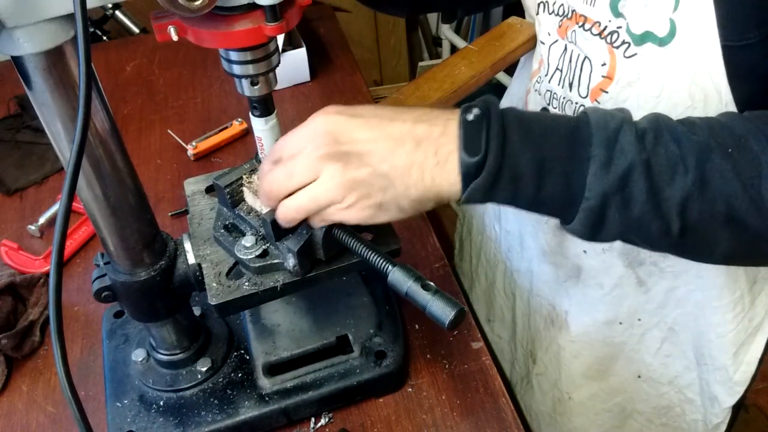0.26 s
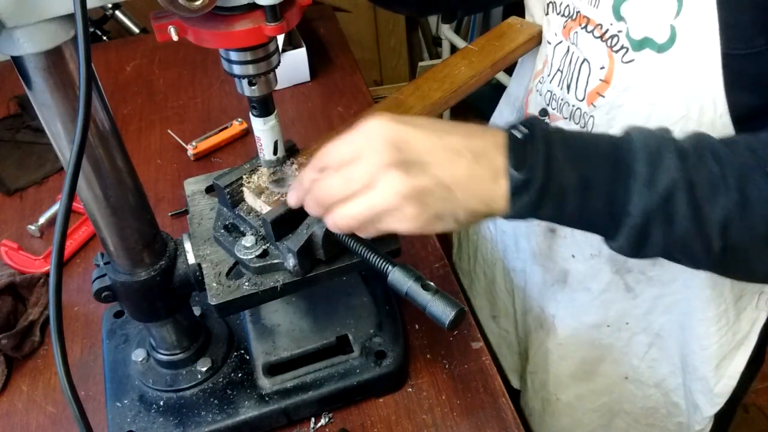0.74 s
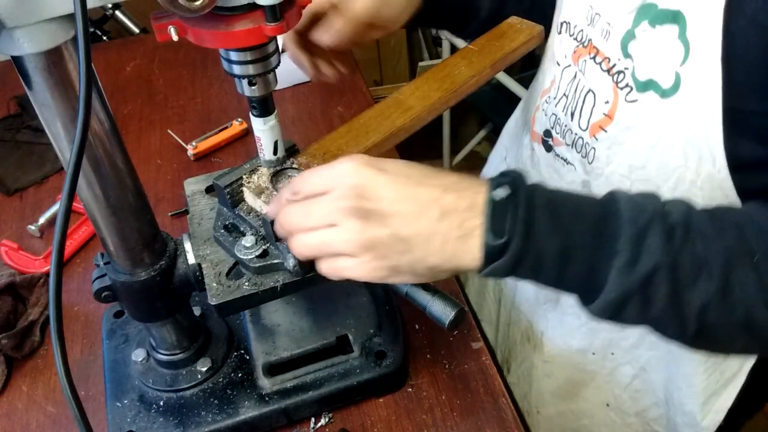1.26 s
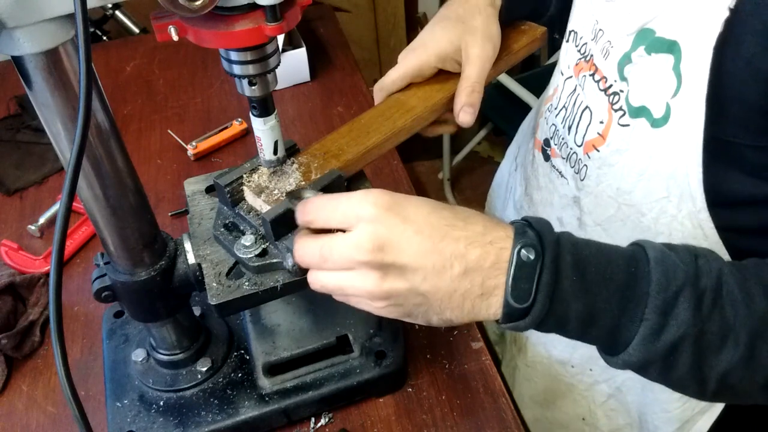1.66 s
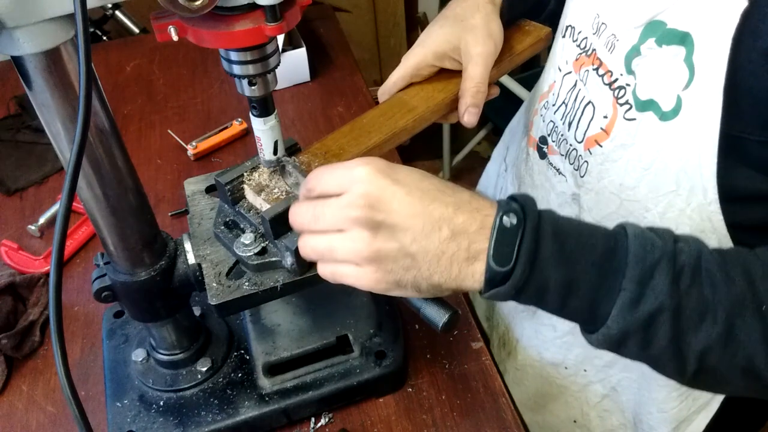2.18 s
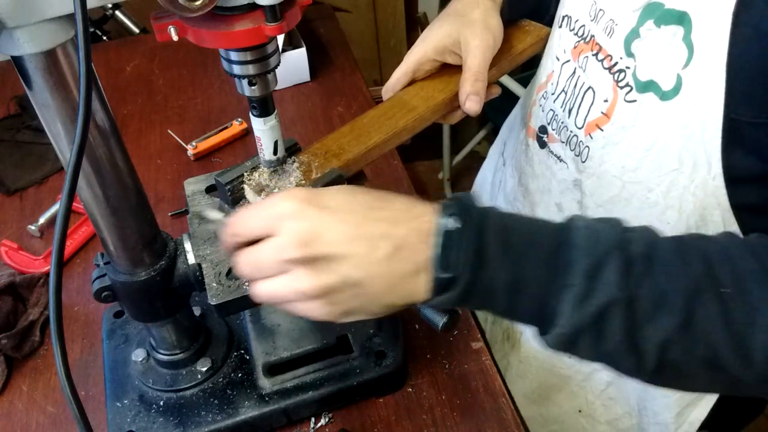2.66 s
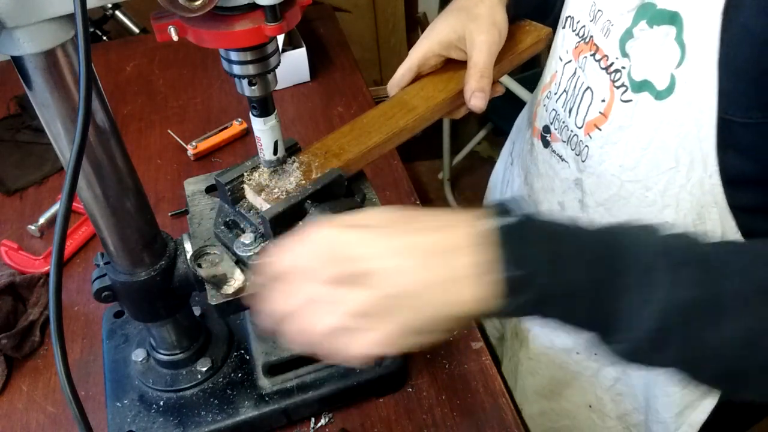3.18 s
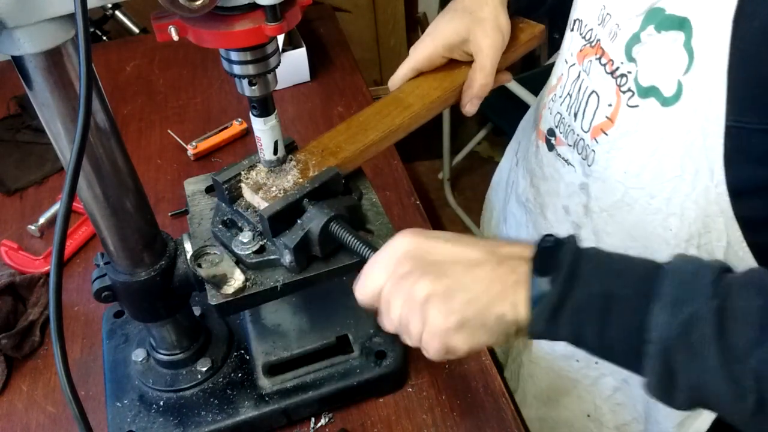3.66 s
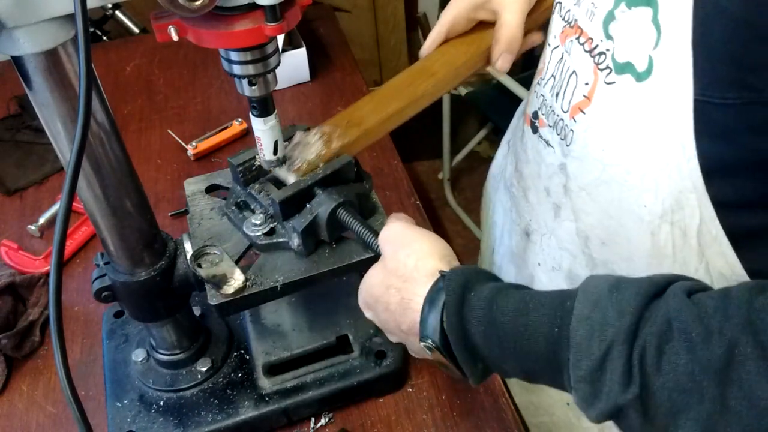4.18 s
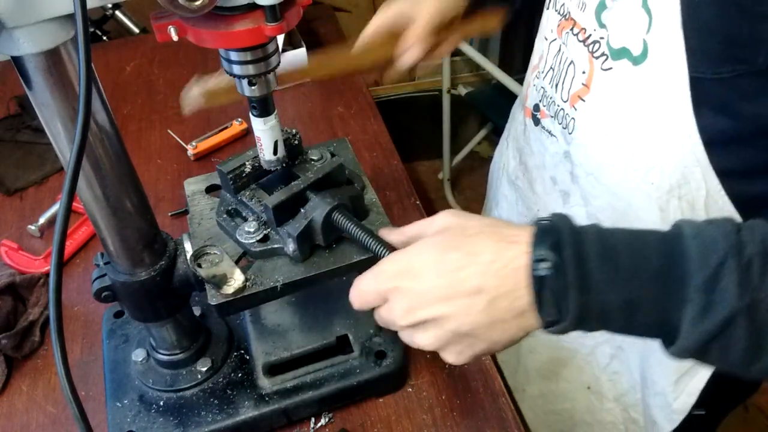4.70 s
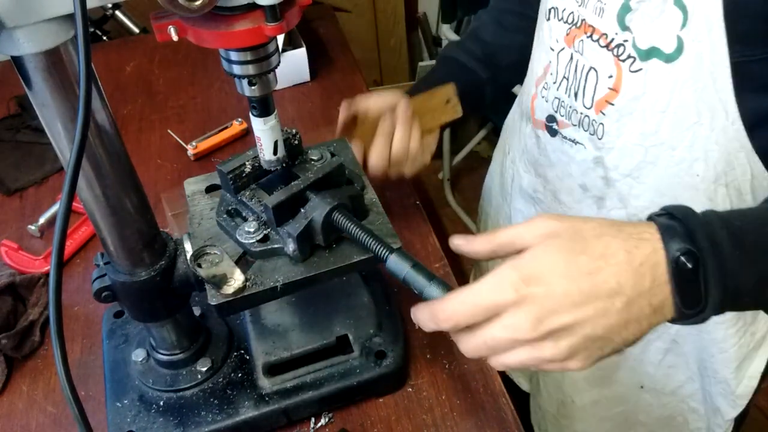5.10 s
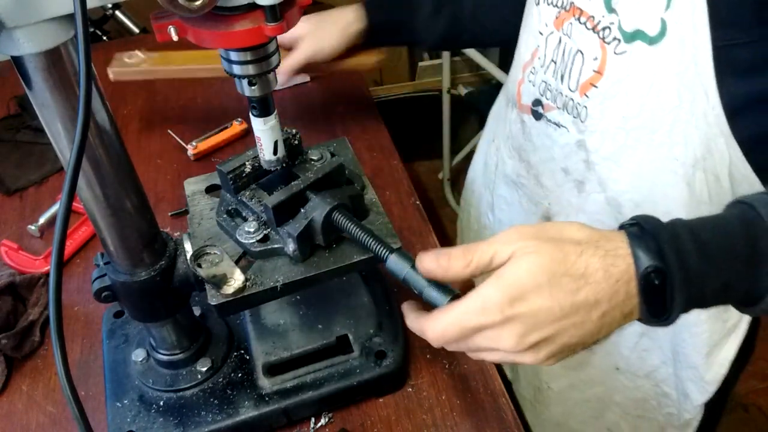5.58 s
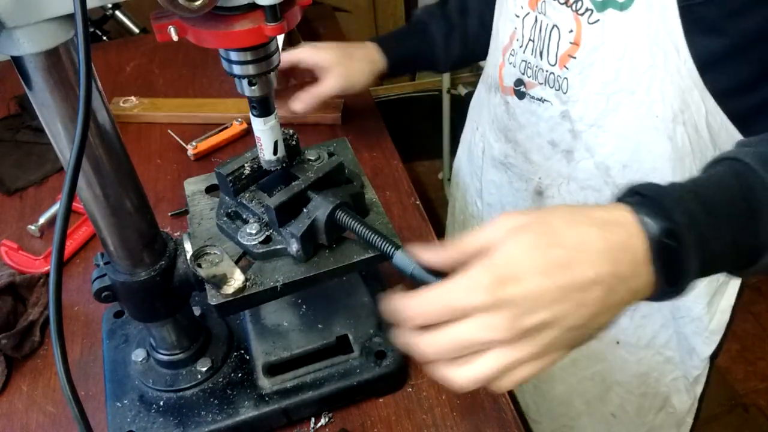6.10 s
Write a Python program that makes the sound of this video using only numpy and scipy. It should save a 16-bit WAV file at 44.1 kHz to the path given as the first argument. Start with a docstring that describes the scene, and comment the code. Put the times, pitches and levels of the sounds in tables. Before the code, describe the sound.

A small, hard-walled workshop heard by a close stereo microphone, with faint low air noise and hum. From 0 s fingers rub softly; at about 0.4 s a piece is wrenched with a short raspy groan and small knocks, then grazes a steel cup with a faint high shimmer. At 0.9 s a bright bell-like ping rings briefly, damped by a finger. Quiet rubs and taps continue from 1.4 to 2.3 s, with thinner pings at 1.8 and 2.0 s. At 2.9 s the piece drops, rattling, on an iron table. Vise clacks come at 3.5, 3.8 and 4.0 s. Around 4.0-4.4 s a wooden slat scrapes out with a low creak and a light tap. Loud woody bench bumps land at 4.9 and 5.2 s; the background sinks at 5.3 s. At 5.8-6.0 s the slat is laid down with a quick clatter, the room ringing after.

```python
"""Clearing a drill press vise

In a small workshop a cut-out piece is worked loose, pinging the hole saw, and dropped on the iron table.
The vise clacks open; a wooden slat scrapes out, bumps the bench and is laid down with a clatter.
Blows are coloured noise bursts plus dying modes, rubs are clumps of tiny slips, pings are beating sines.
Filtered noise and faint hum lie beneath; dense reflections with one echo surround the handling."""
import sys
import numpy as np
from scipy import signal
from scipy.fft import rfft, irfft
from scipy.io import wavfile
from scipy.ndimage import uniform_filter1d

SR = 44100
rng = np.random.default_rng(int(sys.argv[2]) if len(sys.argv) > 2 else 0)


def store_pcm(level_fs):
    """Save levels as 16-bit WAV."""
    pcm = np.round(np.clip(level_fs, -1, 1) * 32767).astype(np.int16)
    wavfile.write(sys.argv[1], SR, np.atleast_2d(pcm).T)


N = 279594
TIME = np.arange(N) / SR
HZ = np.fft.rfftfreq(4096, 1 / SR)
# times a left-minus-right difference in dB, this gives each port its half
SIDES = np.array([[.5], [-.5]])


def amp(db):
    """Decibels to gain."""
    return 10 ** (np.asarray(db) / 20)


def evened(x):
    """Scales to rms 1."""
    return x / np.sqrt(np.mean(x ** 2) + 1e-20)


def blow_level(x):
    """Scales to rms 1 over the first 25 ms."""
    return x / np.sqrt(np.mean(x[:, :SR // 40] ** 2))


def read(points, hz):
    """Reads a table on a log-frequency axis."""
    f, value = np.transpose(points)
    return np.interp(np.log(hz + 1), np.log(f + 1), value)


def add(mix, s, sound):
    """Lays a stereo sound into the mix."""
    part = mix[:, max(round(s * SR), 0):][:, :sound.shape[1]]
    part += sound[:, :part.shape[1]]


def lumps(length, size):
    """Slow chance, scaled to rms 1, that changes about every size samples."""
    chance = rng.standard_normal(max(length, 20 * size))
    smooth = uniform_filter1d(chance, size, mode="wrap")
    smooth = uniform_filter1d(smooth, size, mode="wrap")
    return evened(smooth)[:length]


def colour(x, db):
    """Causal filter shaped by db on the HZ grid, its highest point at unity gain."""
    log_gain = np.log(amp(np.maximum(db - db.max(), -90)))
    circle = np.r_[log_gain, log_gain[-2:0:-1]]
    # minimum phase: the Hilbert transform of the log gain supplies the phase
    taps = np.fft.ifft(np.exp(np.conj(signal.hilbert(circle)))).real
    return signal.oaconvolve(x, taps[None], axes=1)[:, :x.shape[1]]


def whitened(x, size=9):
    """Evens out the broad lumps in the spectrum of a burst."""
    z = rfft(x)
    power = uniform_filter1d(abs(z) ** 2, size, axis=1)
    return irfft(z / np.sqrt(power + 1e-12), x.shape[1])


# likeness of the two microphone ports, 1 alike to -1 opposed: pitch_hz, likeness
PORT_LIKENESS = [(900, 0.67), (1700, 0.71), (2400, -1.004), (3600, 0.78), (5000, -0.52), (12000, 1)]


def ports(pair):
    """Blends two unrelated signals: mostly alike in the bass, opposed in parts of the treble."""
    size = pair.shape[1]
    same = np.clip(read(PORT_LIKENESS, np.fft.rfftfreq(size, 1 / SR)), -.98, .98)
    mid, side = rfft(pair) * np.sqrt([(1 + same) / 2, (1 - same) / 2])
    return irfft([mid + side, mid - side], size)


def ring(modes, t, upper_db=0):
    """Dying sines, out of step by the ports' unlikeness; those near 8 kHz are raised by upper_db."""
    out = 0
    for hz, db, t60 in modes:
        port_shift = SIDES * np.arccos(np.clip(read(PORT_LIKENESS, hz), -1, 1))
        phase = 2 * np.pi * rng.random() + port_shift
        level_db = db + upper_db * (7000 < hz < 9000)
        out = out + amp(level_db - 60 * t / t60) * np.sin(2 * np.pi * hz * t + phase)
    return out


def resonances(modes, height_db):
    """Bumps in dB on the HZ grid: a thing answers most near its modes, above all the strong ones."""
    top = max(db for _, db, _ in modes)
    bumps = [np.sqrt(amp(db - top)) / (1 + ((HZ - hz) / (8 + .018 * hz)) ** 2) for hz, db, _ in modes]
    return height_db * np.max(bumps, axis=0)


# how long the room rings: pitch_hz, t60_s
ROOM_T60 = [(100, 0.66), (3500, 0.46), (6000, 0.44), (14000, 0.043)]
# the far wall's smeared echo, its height over the tail in dB
ECHO_S, ECHO_SPREAD_S, ECHO_DB = 0.0511, 0.0043, 3


def room(x, build_s=0.0027):
    """Dense reflections build up quickly, each band dying at its own speed, with one far-wall echo."""
    age = TIME[:SR]
    hz, t, z = signal.stft(whitened(rng.standard_normal((2, SR))), SR, nperseg=256)
    decay = amp(-60 * t / read(ROOM_T60, hz)[:, None])
    tail = signal.istft(z * decay, SR, nperseg=256)[1][:, :SR]
    echo = amp(ECHO_DB * np.exp(-((age - ECHO_S) / ECHO_SPREAD_S) ** 2))
    tail = ports(whitened(tail, size=80)) * (1 - np.exp(-(age / build_s) ** 2)) * echo
    tail = tail[:, :SR * 3 // 4]
    # the right port alone feeds the room
    return signal.oaconvolve(x[1:], tail / np.linalg.norm(tail[0]), axes=1)[:, :N]


def push(start, length, rise_s, sag_db_per_s, release_t60):
    """One stroke: the pressure builds, sags (or swells if negative) during the slide, and is let go."""
    age = TIME - start
    slide_db = -sag_db_per_s * np.clip(age, 0, length)
    release_db = -60 * np.clip((age - length) / release_t60, 0, 2)
    return np.clip(age / rise_s, 0, 1) * amp(slide_db + release_db)


def patchy(x, depth_db):
    """The contact point wanders, so resonances swell and fade at random."""
    z = signal.stft(x, nperseg=1024)[2]
    patches = uniform_filter1d(rng.standard_normal(z.shape[1:]), size=4, axis=0)
    patches = evened(uniform_filter1d(patches, size=7, axis=1))
    return evened(signal.istft(z * amp(depth_db * patches), nperseg=1024)[1][:, :N])


def drifting(x, wander=.022):
    """The grip shifts as the thing slides, so its resonances drift by a small share of their pitch."""
    place = np.cumsum(1 + wander * lumps(N, size=900)) % (N - 1)
    return np.array([np.interp(place, np.arange(N), side) for side in x])


# colour of the gritty hiss at a rubbing contact: pitch_hz, density_db (per Hz, relative)
GRIT_COLOUR = [(1400, -20), (2200, 5), (3800, 8.5), (5200, 3.5), (8300, 1), (15500, -23.5)]


def rubbed(strokes, body, modes, rise_s=0.031, sag_db_per_s=-5.0, release_t60=0.18, slips_per_s=600,
           spread_db=6, smooth=0.82, peaks_db=12, room_db=-5, clump_db=2.2):
    """Under each stroke, clumps of tiny slips shake the thing and hiss at the contact."""
    _, _, pressure_db, grit_db = np.transpose(strokes)
    pushes = np.array([push(start, length, rise_s, sag_db_per_s, release_t60)
                       for start, length, _, _ in strokes])
    slip_sizes = amp(spread_db * np.minimum(rng.exponential(1, N), 2))
    slips = (rng.random(N) < slips_per_s / SR) * slip_sizes
    signed_slips = evened(slips * rng.choice([-1, 1], (2, N)))
    drive = ports(signed_slips + smooth * rng.standard_normal((2, N)))
    drive = patchy(drive, depth_db=3.5)
    peaks = resonances(modes, peaks_db)
    shake = drifting(colour(drive, read(body, HZ) + peaks)) * amp(clump_db * lumps(N, size=350))
    hiss = colour(drive, read(GRIT_COLOUR, HZ) + peaks / 2)
    out = np.zeros((2, N))
    for layer, db in [(shake, pressure_db), (hiss, grit_db)]:
        out += evened(layer) * np.max(amp(db)[:, None] * pushes, axis=0)
    return out + amp(room_db) * room(out)


def struck(blows, body, modes, body_t60, crack_t60, rise_s, rattle_db, peaks_db, ring_db, room_db,
           bass_hz=350, treble_hz=2500):
    """Each blow: a rattling burst, body and treble dying separately, then lasting modes and the room."""
    near, rings, t = np.zeros((2, N)), np.zeros((2, N)), TIME[:SR]
    age = TIME[:2 * len(HZ)]
    split = signal.butter(2, treble_hz, fs=SR)
    for s, db, bass_db, treble_db in blows:
        chatter = amp(-rattle_db * abs(lumps(len(age), size=80))) * (1 - np.exp(-age / rise_s))
        noise = rng.standard_normal((2, len(age))) * chatter
        thud = whitened(noise * amp(-60 * age / body_t60), size=17)
        crack = whitened(noise * amp(-60 * age / crack_t60), size=17)
        # the thud below the split, the crack above it
        burst = ports(crack + signal.lfilter(*split, thud - crack))[:, :len(HZ)]
        burst = np.pad(burst, ((0, 0), (0, SR - len(HZ))))
        # a heavy contact adds bass, a hard one treble
        touch = bass_db / (1 + (HZ / bass_hz) ** 4) + treble_db / (1 + (treble_hz / (HZ + 1)) ** 4)
        burst = colour(burst, read(body, HZ) + resonances(modes, peaks_db) + touch)
        tones = colour(ring(modes, t) * (1 - np.exp(-t / rise_s)), touch)
        add(near, s, amp(db) * blow_level(burst))
        add(rings, s, amp(db + ring_db) * blow_level(tones))
    return near + rings + amp(room_db) * room(near)


# colour of the workshop air: pitch_hz, density_db (per Hz, relative)
AIR_COLOUR = [(20, -35.5), (66, -4), (156, -12.5), (1550, -23.5), (2600, -26.5), (7400, -34), (8600, -28.5),
              (9800, -40), (15500, -40)]
# faint hum: pitch_hz, level_db
HUM_TONES = [(100, -58.5), (215, -62.5)]
# when the background sinks, over how long, by how much
SINK_AT_S, SINK_S, SINK_DB = 5.3, 0.091, 10.5


def background(air_db=-53, flutter=0.19):
    """Filtered noise with hum wavering in phase; late on the level sinks briskly and stays down."""
    air = evened(colour(ports(rng.standard_normal((2, N))), read(AIR_COLOUR, HZ)))
    hum = sum(amp(db) * np.sin(2 * np.pi * hz * TIME + flutter * lumps(N, size=5000))
              for hz, db in HUM_TONES)
    sunk = np.clip((TIME - SINK_AT_S) / SINK_S, 0, 1)
    return (amp(air_db) * air + hum) * amp(SIDES * 2.2 - SINK_DB * sunk)


# modes of the iron table and vise: pitch_hz, level_db, t60_s
IRON_MODES = [(226, -12, .5), (345, -6, .25), (441, -4, .22), (590, -4, .24), (745, -3, .15), (942, -3, .1),
              (1324, 8, .15), (1420, 5, .18), (2789, 0, .085), (3640, -8, .12)]
# colour of a raspy stroke: pitch_hz, density_db (per Hz, relative)
RASP_COLOUR = [(50, -36), (170, 1.5), (270, -6.5), (700, -2.5), (1300, -9), (1800, -13), (2700, -22.5),
               (5000, -43.5)]
# finger strokes: start_s, length_s, pressure_db, hiss_db
FINGER_RUBS = [(0, 0.73, -50.5, -66), (.5, 0.25, -52, -56), (.82, 0.069, -41.5, -57),
               (1.6, 0.35, -44.5, -54), (2.0, 0.2, -44, -53.5), (2.26, 0.5, -55.5, -60.5)]


def finger_rubs():
    """Fingers rub softly: small, even slips with weak resonances and a slow release."""
    return rubbed(FINGER_RUBS, RASP_COLOUR, IRON_MODES, sag_db_per_s=5.5, release_t60=0.35,
                  slips_per_s=530, spread_db=2.5, smooth=0.85, peaks_db=2.5, room_db=-3.5)


# the wrench at the piece: start_s, length_s, pressure_db, hiss_db
PIECE_WRENCH = [(.361, 0.15, -21, -38.5)]


def piece_wrench():
    """The piece is wrenched: sparse slips under a pressure that sags fast."""
    return rubbed(PIECE_WRENCH, RASP_COLOUR, IRON_MODES, rise_s=0.018, sag_db_per_s=40.5,
                  release_t60=0.11, slips_per_s=300, spread_db=6, smooth=0.45, peaks_db=7, room_db=-7.0)


# squeaks and groans of the piece and the slat: peak_s, length_s, pitch_hz, level_db
SQUEAKS = [(0.406, .06, 440, -22.5), (1.762, 0.061, 426.4, -39), (4.208, 0.05, 214.6, -30)]


def squeaks(waver=0.0063, room_db=-6):
    """Stick and slip: for a moment the slips lock to one resonance, a wavering sine that swells and fades."""
    out = np.zeros((2, N))
    for s, length, hz, db in SQUEAKS:
        size = int(length * SR)
        pitch_hz = hz * (1 + waver * lumps(size, size=150))
        tone = np.sin(2 * np.pi * np.cumsum(pitch_hz) / SR) * np.hanning(size)
        add(out, s - length / 2, amp(db) * evened(np.array([tone, tone])))
    return out + amp(room_db) * room(out)


# modes of the hole saw, in close pairs at 5.4 and 8.2 kHz: pitch_hz, level_db, t60_s
SAW_MODES = [(3795, -10, .14), (5444, 0, .46), (5452, -8, .4), (8175, -2, .42), (8204, -9, .34),
             (11355, -20, .22), (15280, -20, .25)]
# the piece grazes the saw's rim: start_s, length_s, level_db
RIM_RUBS = [(0.497, 0.4, -57), (1.362, 0.06, -53.5), (1.584, 0.14, -54.5), (2.083, 0.11, -49.5)]


def rim(damp_s=0.0084, flutter_db=4):
    """The piece grazes the saw's teeth and noise keeps its damped modes shimmering."""
    t = TIME[:len(HZ)]
    damped_ring = ring(SAW_MODES, t, upper_db=-7) * np.exp(-t / damp_s)
    shimmer = signal.oaconvolve(rng.standard_normal((2, N)), damped_ring, axes=1)[:, :N]
    pressure = sum(amp(db) * push(start, length, damp_s, 0, SAW_MODES[0][2])
                   for start, length, db in RIM_RUBS)
    return evened(shimmer * amp(flutter_db * lumps(N, size=300))) * pressure


# touches on the saw's rim: start_s, strength_db, extra_8khz_db, free_s (until a finger damps it)
SAW_PINGS = [(0.907, -30.5, -14, 0.086), (0.932, -20, -5, 0.044), (1.811, -26.5, 10.5, 0.014),
             (2.028, -30.5, -2.5, 0.011), (2.917, -35, 5, 0.075)]
# a touch softer than FIRM_DB rings duller: dB per octave for each dB less
FIRM_DB, DULLING = -19, 0.83


def saw(damped_db=-18, damp_s=0.0046, flutter_db=6, room_db=-13):
    """The steel cup rings like a small bell, pairs beating, until a finger damps it and the rest flutters."""
    out, t = rim(), TIME[:SR]
    for s, db, upper_db, free_s in SAW_PINGS:
        tilt_db = DULLING * (db - FIRM_DB)
        modes = [(hz, level + tilt_db * np.log2(hz / SAW_MODES[0][0]), t60) for hz, level, t60 in SAW_MODES]
        # half the damping creeps in over free_s, the rest follows quickly
        creeping = np.minimum(t / free_s, 1)
        gripping = 1 - np.exp(-np.maximum(t - free_s, 0) / damp_s)
        touch = (creeping + gripping) / 2
        held = amp(touch * (damped_db + flutter_db * lumps(SR, size=400)))
        add(out, s, amp(db) * blow_level(ring(modes, t, upper_db) * held))
    return (out + amp(room_db) * room(out)) * amp(SIDES * -3)


# colour of the table's dense short modes: pitch_hz, density_db (per Hz, relative)
TABLE_COLOUR = [(60, -32.5), (300, -13.5), (700, 3), (1400, -1), (3800, -8), (8000, -23.5), (15500, -49.5)]
# taps while the piece is worked loose: start_s, strength_db, extra_bass_db, extra_treble_db
PIECE_TAPS = [(.3722, -25.5, -12, -9), (.3935, -25, 5, -26), (.4645, -25.5, 17, -30), (.821, -40.5, 23, -6),
              (.909, -31, -10, -0.5), (.9302, -30, 7, 21), (1.361, -46, 19, 9), (1.402, -43.5, 19, 5.5),
              (1.596, -39, 23, 0.5), (1.811, -29.5, 0, 13.5), (1.974, -35.5, 17.5, -56), (2.029, -32, 7, 3),
              (2.242, -39.5, 23.5, 2)]


def piece_taps():
    """The piece knocks as it is worked loose: sharp onsets that stir the iron's modes."""
    return struck(PIECE_TAPS, TABLE_COLOUR, IRON_MODES, body_t60=0.1, crack_t60=0.046, rise_s=0.000067,
                  rattle_db=4.5, peaks_db=5.0, ring_db=-3.5, room_db=-5.5)


# the piece lands: start_s, strength_db, extra_bass_db, extra_treble_db
TABLE_DROPS = [(2.9158, -20, -9, 12), (2.9268, -17.5, 6, -2.5)]


def table_drops():
    """The piece drops on the iron table: a strongly rattling burst with a softer onset."""
    return struck(TABLE_DROPS, TABLE_COLOUR, IRON_MODES, body_t60=0.049, crack_t60=0.033, rise_s=0.0017,
                  rattle_db=10.5, peaks_db=7, ring_db=-9, room_db=-10)


# mode of the vise handle: pitch_hz, level_db, t60_s
HANDLE_MODES = [(1048, 8.7, 0.1)]
# the vise is bolted to the iron table and rings with it
VISE_MODES = IRON_MODES + HANDLE_MODES
# colour of the vise's dense short modes: pitch_hz, density_db (per Hz, relative)
VISE_COLOUR = [(60, -23), (300, -4.5), (950, 2.5), (1450, -6), (2100, -6), (4500, -13.5), (15500, -44)]
# clacks of the vise: start_s, strength_db, extra_bass_db, extra_treble_db
VISE_CLACKS = [(3.469, -34.5, 29, 19.5), (3.5402, -16.5, -8, 2), (3.7615, -16.5, 4.5, 1),
               (3.9582, -21, 4, -8.5), (4.004, -39.5, -4, 42), (4.180, -27.5, 19, 4), (4.196, -36, 15, 17)]


def vise_clacks():
    """The vise clacks open: bursts with tall resonances of iron and handle."""
    return struck(VISE_CLACKS, VISE_COLOUR, VISE_MODES, body_t60=.052, crack_t60=.035, rise_s=0.00084,
                  rattle_db=5.5, peaks_db=11, ring_db=-5.5, room_db=-5.0)


# colour of a sliding stroke: pitch_hz, density_db (per Hz, relative)
SLIDE_COLOUR = [(40, -38), (90, 0), (350, 5.5), (1100, -7), (2500, -24.5), (5000, -45)]
# strokes at the vise, first the screw turning, then the slat dragging through its jaws: start_s, length_s,
# pressure_db, hiss_db
VISE_RUBS = [(3.47, 0.65, -49.5, -61), (4.03, 0.16, -32.5, -39.5), (4.19, 0.022, -22.5, -34.5),
             (4.36, 0.11, -29, -39.5)]


def vise_rubs():
    """Rubbing at the screw and the jaws shakes the vise, the pressure swelling along each stroke."""
    return rubbed(VISE_RUBS, SLIDE_COLOUR, VISE_MODES)


# modes of the wooden slat: pitch_hz, level_db, t60_s
SLAT_MODES = [(727, -8, .3), (1345, -9, .35), (1781, 3, .16), (3040, -11, .35), (3240, -9, .22)]
# colour of the slat's dense short modes: pitch_hz, density_db (per Hz, relative)
SLAT_COLOUR = [(70, -19.5), (400, -1), (1000, 7), (1800, 0), (3500, -5), (5100, -21.5), (6400, -22),
               (15000, -68.5)]
# the slat's own scrape: start_s, length_s, pressure_db, hiss_db
SLAT_RUBS = [(4.2, 0.11, -35.5, -36.5)]


def slat_rubs():
    """The slat scrapes along its edge, which stirs only the upper modes."""
    return rubbed(SLAT_RUBS, SLAT_COLOUR, SLAT_MODES[2:], peaks_db=27.5)


# modes of the bench: pitch_hz, level_db, t60_s
BENCH_MODES = [(113, -14, .42), (228, 0, .35), (349, -8, .28), (440, -10, .3), (635, -2, .25),
               (1001, -5, .26)]
# colour of the bench's dense short modes: pitch_hz, density_db (per Hz, relative)
BENCH_COLOUR = [(30, -47), (110, -16), (240, -5), (630, -4), (1100, -9.5), (1600, -22.5), (15000, -57.5)]
# the slat hits the bench: start_s, strength_db, extra_bass_db, extra_treble_db
BENCH_BUMPS = [(4.9065, -10, 0.45, 3), (4.914, -24.5, 5, -2), (5.1828, -11, 1.7, -1),
               (5.7925, -17.5, 2.4, -2.5)]


def bench_bumps():
    """The slat bumps the bench: low, woody bursts with hardly any rattle."""
    return struck(BENCH_BUMPS, BENCH_COLOUR, BENCH_MODES, body_t60=0.039, crack_t60=0.045, rise_s=0.0001,
                  rattle_db=1.5, peaks_db=4.5, ring_db=-4, room_db=-5.0, treble_hz=1750)


# the slat clatters: start_s, strength_db, extra_bass_db, extra_treble_db
SLAT_CLATTER = [(4.3132, -30, -9, 13), (5.793, -29, 5, -9), (5.8335, -13.5, 5, -8.5), (5.8415, -17, 7, 8.5),
                (5.884, -25.5, 2, -3.5), (5.9588, -20, 13, 10.5)]


def slat_clatter():
    """The slat clatters: short bursts with plenty of room around them and the wood's modes ringing after."""
    return struck(SLAT_CLATTER, SLAT_COLOUR, SLAT_MODES, body_t60=0.026, crack_t60=0.016, rise_s=0.00084,
                  rattle_db=5, peaks_db=1.5, ring_db=-5, room_db=-2.0)


# balance of the two ports over the whole mix: pitch_hz, left_minus_right_db
PORT_BALANCE = [(900, -3.5), (1600, -0.5), (3400, -2), (7000, -1.5), (12000, -12.5)]


def scene():
    """All the handling, heard through two unequal microphone ports."""
    mix = background() + finger_rubs() + piece_wrench() + squeaks() + saw()
    mix += piece_taps() + table_drops()
    mix += vise_clacks() + vise_rubs()
    mix += slat_rubs() + bench_bumps() + slat_clatter()
    balance_db = SIDES * read(PORT_BALANCE, np.fft.rfftfreq(2 * N, 1 / SR))
    return irfft(rfft(mix, 2 * N) * amp(balance_db))[:, :N]


def record(dry, low_cut_hz=38, edge_hz=15900):
    """The microphone sheds the deepest bass, the input clips at full scale, then the band is limited."""
    low_cut = signal.butter(2, low_cut_hz, "highpass", fs=SR, output="sos")
    heard = np.clip(signal.sosfilt(low_cut, dry), -1, 1)
    band_limit = signal.firwin(255, edge_hz, window=("kaiser", 8), fs=SR)
    return signal.oaconvolve(heard, band_limit[None], "same")


dry = scene()
out = record(dry)
store_pcm(out)
```